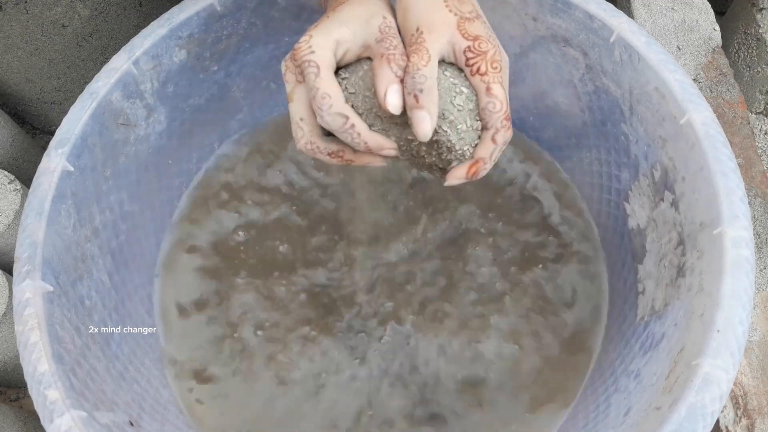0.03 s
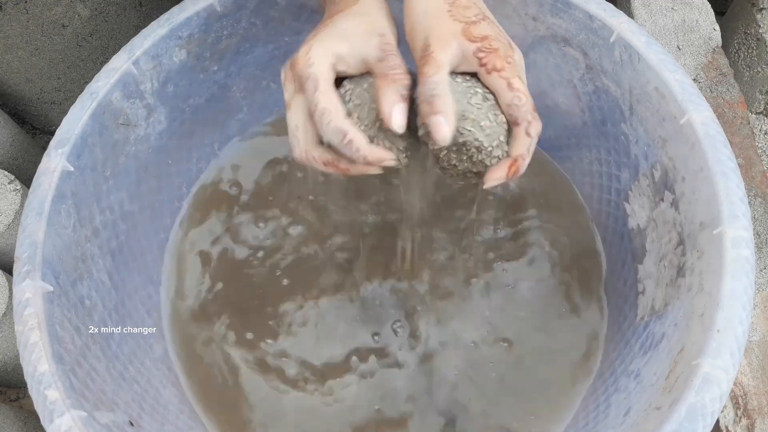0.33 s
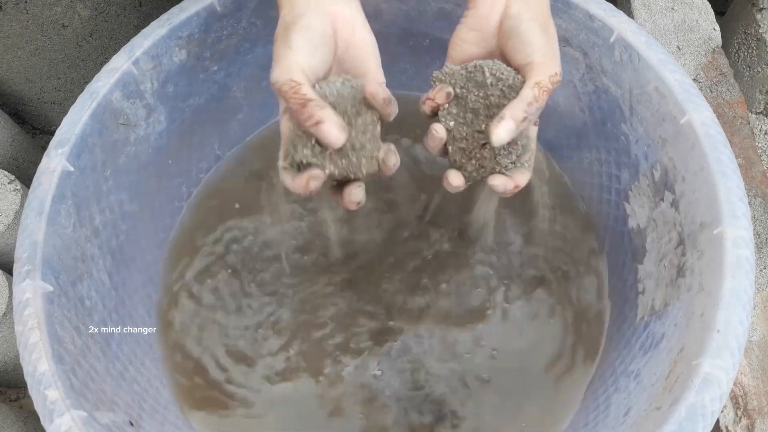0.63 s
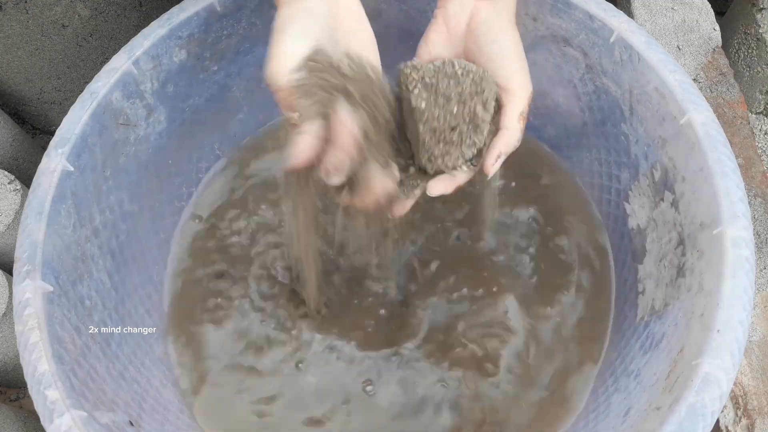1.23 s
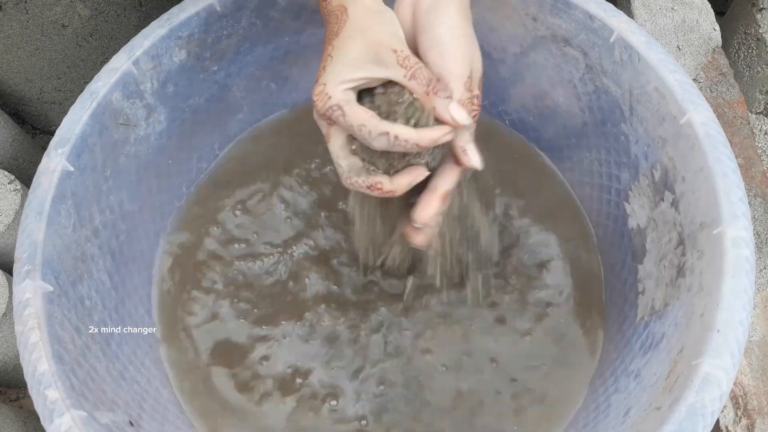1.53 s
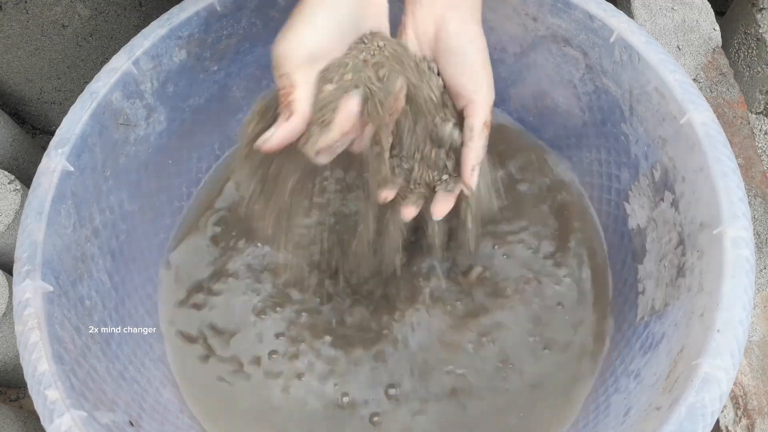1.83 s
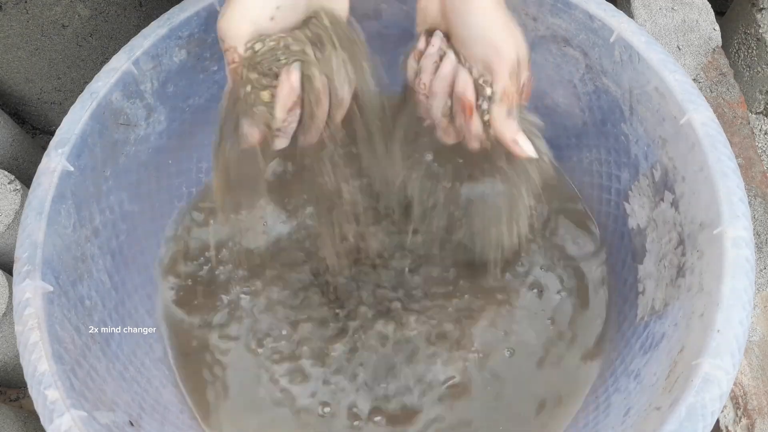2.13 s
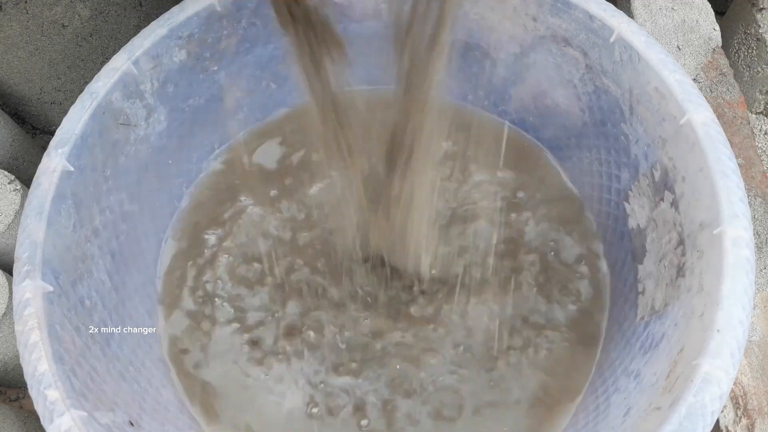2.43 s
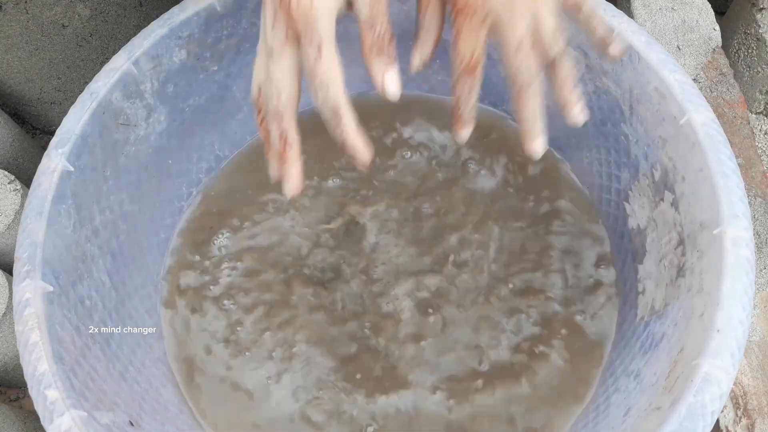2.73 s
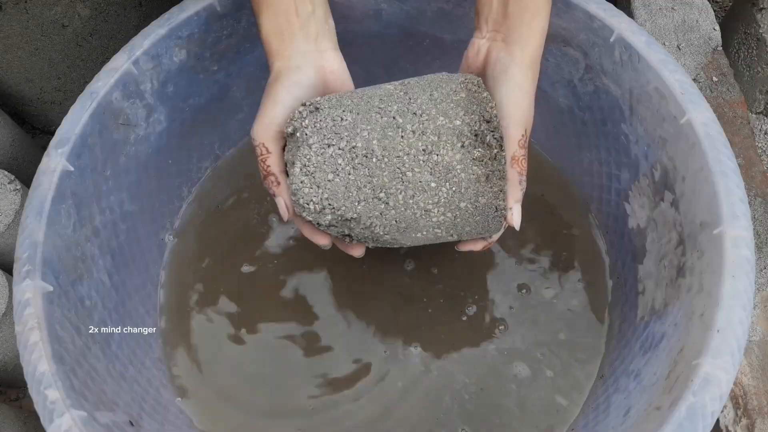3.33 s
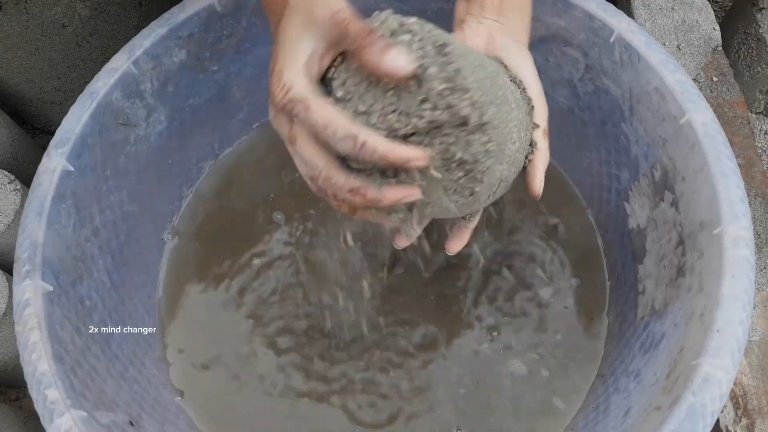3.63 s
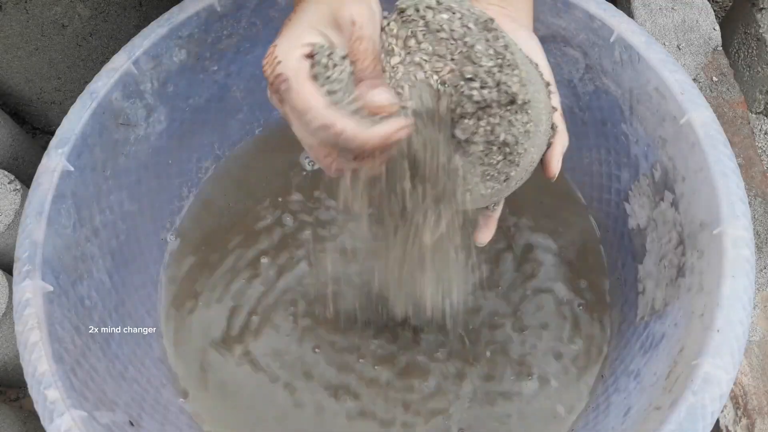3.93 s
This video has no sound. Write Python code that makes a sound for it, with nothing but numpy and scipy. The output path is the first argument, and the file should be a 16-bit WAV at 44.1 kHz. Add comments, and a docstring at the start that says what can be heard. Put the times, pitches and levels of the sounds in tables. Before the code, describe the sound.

Gritty sand crumbled into a tub of water, hissing and plopping, with one short pause.

```python
"""Sand crumbled into water

Hands crumble a block of dry, gritty sand over a plastic tub of muddy water, close up. Fine grains
hiss on the surface and trap small bubbles; clumps plop, crumbs plink, grit ticks, and the last
handful gurgles in. The pour stops short, the water settles, and a new block starts to crumble."""
import sys
import numpy as np
from scipy import signal
from scipy.fft import rfft, irfft, next_fast_len
from scipy.io import wavfile
from scipy.ndimage import uniform_filter1d

SR = 44100
rng = np.random.default_rng(int(sys.argv[2]) if len(sys.argv) > 2 else 0)


def master(y):
    """Save y as 16-bit WAV."""
    cut = np.clip(np.atleast_2d(y).T, -1, 1)
    pcm = np.round(cut * 32767)  # scale
    wavfile.write(sys.argv[1], SR, pcm.astype(np.int16))


N = 176400
TIME = np.arange(N) / SR


def amp(db):
    """Decibels to gain."""
    return 10 ** (np.asarray(db) / 20)

def unit(x):
    """x scaled to rms 1."""
    return x / np.sqrt(np.mean(x ** 2) + 1e-20)

def steady(x, window=4000):
    """A leveller: rides x towards rms 1 over a window of samples."""
    power = np.abs(uniform_filter1d(x ** 2, window))
    return x / np.sqrt(power + power.mean() / 100)

def curve(rows, column, times=TIME):
    """One column of a table as an automation curve."""
    rows = np.asarray(rows)
    return np.interp(times, rows[:, 0], rows[:, column])

def flutter(per_s, depth_db):
    """A random level flutter in dB."""
    knots = np.clip(rng.standard_normal(2048), -1.3, 1.3)
    return depth_db * np.interp(TIME * per_s, np.arange(2048), knots)

def random_gains(count, spread_db):
    """Gains scattered around unity."""
    return amp(spread_db * np.clip(rng.standard_normal(count), -2, 2))

def add(track, start, sound):
    """Mix a sound in at start seconds."""
    part = track[max(round(start * SR), 0):][:len(sound)]
    part += sound[:len(part)]

def filtered(x, response):
    """x through a complex frequency response."""
    size = 2 * next_fast_len(N // 2 + SR // 8)
    return irfft(rfft(x, size) * response(np.fft.rfftfreq(size, 1 / SR)), size)[..., :N]

def coloured(x, eq):
    """x through a minimum-phase EQ curve, at rms 1."""
    def response(hz):
        eq_hz, eq_db = np.transpose(eq)
        gain = amp(np.interp(np.log(hz + 1), np.log(eq_hz), eq_db))
        cepstrum = irfft(np.log(gain))
        half = len(cepstrum) // 2
        cepstrum[1:half] *= 2
        cepstrum[half + 1:] = 0
        return np.exp(rfft(cepstrum))
    return unit(filtered(x, response))

def bubbles(births, hz, length, size=1000, decay_cycles=9.7, rise_per_decay=0.015):
    """A cloud of bubbles, each ringing as a damped, slightly rising sine."""
    t = np.arange(size) / SR
    cycles = hz[:, None] * t
    age = cycles / decay_cycles
    gain = random_gains(len(births), spread_db=2.5) * np.sqrt(hz)
    tone = np.sin(2 * np.pi * cycles * (1 + rise_per_decay * np.minimum(age, 10) / 2))
    envelope = np.minimum(cycles, 1) * np.exp(-age) * (1 - t / t[-1])
    index = (np.maximum(births, 0) * SR).astype(int)[:, None] + np.arange(size)
    return np.bincount(index.ravel(), (gain[:, None] * tone * envelope).ravel(), length)[:length]


# EQ of the outdoor bed: (frequency [Hz], relative level [dB])
RUMBLE_EQ = [(25, -5), (60, -4.5), (120, 4.5), (190, 4), (260, -5), (600, -2), (1200, -13.5), (3000, -30),
             (16000, -47)]

def rumble(level_db):
    """A bed of low outdoor noise."""
    return amp(level_db) * coloured(rng.standard_normal(N), RUMBLE_EQ)

def rubbing(start=3.26, centre_hz=488, end_db=-40.5):
    """A dull scrape swells as the palms grip and turn the new block."""
    octave = [centre_hz / np.sqrt(2), centre_hz * np.sqrt(2)]
    scrape = signal.lfilter(*signal.butter(2, octave, "band", fs=SR), rng.standard_normal(N))
    grip = np.maximum(TIME - start, 0)
    return amp(end_db) * unit(scrape) * np.sqrt(grip / grip[-1])

# Fingers squeezing the block: (start [s], end [s], level [dB])
FINGER_SQUEEZES = [(0, .27, -36.5), (0.63, 0.711, -27.5), (1.25, 1.493, -30.5), (3.634, 4, -32)]

def crumbling(cracks_per_s=1400, decay_s=0.00069, bright_hz=13700):
    """A rustle of tiny bright cracks as the fingers break the dry crust."""
    snaps = (rng.random(N) < cracks_per_s / SR) * random_gains(N, spread_db=4)
    envelope = signal.fftconvolve(snaps, np.exp(-TIME[:400] / decay_s))[:N]
    cracks = envelope * rng.standard_normal(N)
    rustle = unit(signal.lfilter(*signal.iirpeak(bright_hz, Q=2.5, fs=SR), cracks))
    return rustle * sum(amp(db) * ((TIME >= start) & (TIME < end)) for start, end, db in FINGER_SQUEEZES)

# Low thuds on the tub: (time [s], relative level [dB])
BUMP_HITS = [(0.495, -16.5), (1.038, -11.5), (2.427, -15.5)]

def bumps(body_hz=243):
    """Heavy lumps give the tub a dull push."""
    out = np.zeros(N)
    age = 2 * np.pi * body_hz * TIME[:4000]
    for start, db in BUMP_HITS:
        add(out, start, amp(db) * (1 - age) * np.exp(-age))
    return out

# Ticks on the surface: (time [s], level [dB], ring [Hz])
GRIT_TICKS = [(.044, -13, 12000), (0.2016, -14.5, 7000), (0.398, -18, 13000), (0.445, -18.5, 4070),
              (0.467, -11.5, 6300), (0.494, -10, 6600), (0.565, -16.5, 7000), (.693, -12.5, 8500),
              (0.808, -16.5, 11000), (0.997, -13.5, 11800), (1.038, -4, 7000), (1.2201, -6.5, 6500),
              (1.408, -17.5, 3180), (1.465, -10, 11600), (1.537, -13, 5730), (1.865, -13.5, 6950),
              (2.253, -8, 6840), (2.333, -9, 7550), (2.43, -9, 6770), (2.667, -9, 6100),
              (2.758, -8.5, 5600), (2.943, -26, 11000), (3.121, -32.5, 5700), (3.636, -15, 12600),
              (3.703, -14, 6700), (3.757, -13.5, 7360)]

def grit(crack_db=-7.5, low_cut_hz=4300):
    """Each bit of grit lands with a sharp crack and a brief, high ring."""
    out, t = np.zeros(N), TIME[:1200]
    for start, db, ring_hz in GRIT_TICKS:
        crack, ring = rng.standard_normal((2, len(t)))
        crack = unit(np.tanh(signal.lfilter(*signal.butter(1, low_cut_hz, "high", fs=SR), crack)))
        ring = steady(signal.lfilter(*signal.iirpeak(ring_hz, Q=5, fs=SR), ring), window=100)
        decay_s = .0028 * amp(0.31 * db)  # louder bits rattle longer
        add(out, start, amp(db) * (ring + amp(crack_db) * crack) * np.exp(-t / decay_s))
    return out

# Crumbs dropping in: (time [s], pitch [Hz], level [dB])
CRUMB_PLINKS = [(.002, 1206, -27.5), (0.203, 2760, -28.5), (1.006, 3470, -21.5), (2.396, 2820, -20),
                (2.494, 1680, -20.5), (2.676, 2920, -22), (2.805, 1145, -34.5), (3.561, 2630, -33.5),
                (3.636, 2280, -28.5), (3.71, 3340, -28), (3.752, 1493, -21.5), (3.98, 1260, -17)]

def plinks(swell_s=.0035, rise_per_s=2):
    """A crumb traps one bubble, which swells, rings and rises a little in pitch."""
    out, t = np.zeros(N), TIME[:1800]
    envelope = t / swell_s * np.exp(1 - t / swell_s)
    for start, hz, db in CRUMB_PLINKS:
        cycles = hz * t * (1 + rise_per_s * t / 2) + rng.random()
        add(out, start, amp(db) * envelope * np.sin(2 * np.pi * cycles))
    return out

# Clumps dropping in: (time [s], length [s], pitch [Hz], glide [octaves], level [dB])
CLUMP_PLOPS = [(0.059, 0.1, 1555, -0.067, -39.5), (0.226, 0.029, 1810, -0.27, -39.5),
               (0.446, 0.049, 1707, -0.23, -24.5), (0.485, 0.021, 1172, -0.53, -24),
               (0.56, 0.012, 1910, -0.29, -29.5), (0.646, 0.052, 1458, -0.34, -30.5),
               (0.717, 0.036, 1264, 0.18, -33.5), (0.749, 0.03, 1940, 0.37, -35),
               (1.015, 0.0098, 1640, -0.11, -26), (1.064, 0.046, 1032, 0.32, -24.5),
               (1.138, 0.041, 820, -1.02, -28), (1.309, .085, 1560, -0.66, -33.5),
               (1.475, 0.0152, 790, 0.0051, -24), (1.537, 0.017, 1243, 0.062, -21.5),
               (1.982, 0.076, 1240, -0.64, -22), (2.201, 0.027, 778, 0.081, -26),
               (2.725, 0.055, 2030, 0.31, -33), (3.109, 0.083, 1650, -0.24, -53),
               (3.928, 0.059, 1890, -0.054, -31)]

def clumps(count=40, fade_s=.009, small_db=-9):
    """Each clump traps a cluster of bubbles whose pitch glides, with smaller ones an octave above."""
    out = np.zeros(N)
    for start, length, pitch_hz, glide, db in CLUMP_PLOPS:
        t = TIME[:int((length + 4 * fade_s) * SR)]
        slots = (np.arange(count) + rng.random(count)) / count
        births = (slots - slots[0]) * t[-1]
        glide_octaves = glide * (np.minimum(births / length, 1) - .5)
        big_hz = pitch_hz * 2 ** (0.071 * rng.standard_normal(count) + glide_octaves)
        big = steady(bubbles(births, big_hz, len(t)), window=500)
        small_hz = 2 * big_hz * 2 ** (0.323 * rng.standard_normal(count))
        small = steady(bubbles(births, small_hz, len(t)), window=500)
        release = np.exp(-np.maximum(t - 0.76 * length, 0) / fade_s)
        add(out, start, amp(db) * (big + amp(small_db) * small) * release)
    return out

# Air dragged under by the last handful: (time [s], pitch [Hz], relative level [dB])
PLUME_GURGLE = [(2.27, 840, -37), (2.36, 730, -16), (2.42, 580, -23), (2.5, 582, -24.5), (2.54, 578, -35),
                (2.6, 526, -20.5), (2.65, 443, -27.5), (2.7, 497, -23), (2.795, 680, -31),
                (2.825, 626, -55)]

def plume(count=220, scatter_octaves=0.078):
    """Big bubbles gurgle lower as the plume deepens, and higher as it thins."""
    births = rng.uniform(PLUME_GURGLE[0][0], PLUME_GURGLE[-1][0], count)
    hz = curve(PLUME_GURGLE, 1, births) * 2 ** (scatter_octaves * rng.standard_normal(count))
    return steady(bubbles(births, hz, N, size=1800), window=1500) * amp(curve(PLUME_GURGLE, 2))

# Fader moves of the pour: (time [s], hiss level [dB], bubbling level [dB])
POUR_FADERS = [(0, -29.5, -38), (.1, -42, -38.5), (.19, -38, -57), (.225, -31, -51), (.37, -40.5, -66),
               (.425, -39, -58), (.45, -26, -54), (.505, -26, -32), (.535, -34, -45), (.61, -36, -39),
               (.67, -30.5, -44), (.73, -35.5, -41), (.833, -33, -49), (.841, -27.5, -36),
               (.98, -30.5, -33), (1.02, -23.5, -26), (1.07, -23, -32.5), (1.18, -23.5, -30.5),
               (1.26, -30, -38.5), (1.46, -27.5, -32), (1.531, -27, -38), (1.545, -24.5, -34),
               (1.67, -24.5, -31), (1.82, -28.5, -31), (1.93, -25, -26.5), (1.995, -17, -32),
               (2.08, -26, -28.5), (2.22, -21, -28.5), (2.38, -18.5, -27.5), (2.73, -19.5, -35.5),
               (2.812, -25, -38.5), (2.831, -40, -63), (2.935, -48.5, -86), (2.955, -41, -75),
               (3.005, -47.5, -52), (3.2, -60, -56), (3.36, -55.5, -64), (3.425, -45.5, -65),
               (3.46, -34, -53), (3.57, -29.5, -44.5), (3.62, -30.5, -39), (3.635, -28.5, -31),
               (3.73, -31.5, -41), (3.8, -27.5, -36), (3.87, -26, -28.5), (4, -25, -26)]
# EQ of the sand hiss: (frequency [Hz], relative level [dB])
HISS_EQ = [(150, -27), (550, -6), (2500, -1.5), (4500, -4.5), (5600, 1.5), (6300, 5), (7150, 9.5),
           (8200, -3), (9300, -4.5), (11500, 2.5), (13000, 2.5), (15800, -1)]

def sand(wash_db=2):
    """Grains strike the water one by one; the heavier the pour, the more they merge into a wash."""
    level_db = curve(POUR_FADERS, 1)
    grains_per_s = 9000 * np.exp(0.8 * (level_db + 27))  # 9000 with the fader at -27 dB
    strikes = (rng.random(N) < grains_per_s / SR) * rng.choice([-1, 1], N)
    grains = steady(strikes * random_gains(N, spread_db=4))
    hiss = coloured(grains + amp(wash_db) * rng.standard_normal(N), HISS_EQ)
    return hiss * amp(level_db + flutter(per_s=90, depth_db=3.5))

# Tuning of the bubbling, lower for bigger bubbles: (time [s], typical pitch [Hz])
BUBBLE_TUNING = [(0, 1690), (.8, 1904), (1.1, 1208), (2.75, 1455), (2.9, 970), (3.12, 1160), (3.35, 790),
                 (3.57, 2344), (3.9, 1395)]

def bubbling(count=4600, scatter_octaves=0.522):
    """The sand drags air under: a crowd of small, short-lived bubbles."""
    births = rng.uniform(0, N / SR, count)
    detune = scatter_octaves * np.clip(rng.standard_normal(count), -1.7, 2)
    crowd = steady(bubbles(births, curve(BUBBLE_TUNING, 1, births) * 2 ** detune, N))
    return crowd * amp(curve(POUR_FADERS, 2) + flutter(per_s=60, depth_db=1.5))

# Resonances of the air in the tub: (frequency [Hz], bandwidth [Hz], level over the direct sound [dB])
TUB_MODES = [(707, 200, 4), (1140, 184, 6.5), (1761, 178, 8), (2278, 113, 9), (2736, 156, 9),
             (3295, 223, 9.5), (3776, 91, 13), (4310, 52, 13.5), (4827, 25, 6.5)]

def tub(x):
    """The direct sound plus the short ring between the water and the tub's wall."""
    def response(f):
        return 1 + sum(amp(db) * 1j * f * width / (hz * hz - f * f + 1j * f * width)
                       for hz, width, db in TUB_MODES)
    return filtered(x, response)

def stereo_side(x, widest_db=-31.5, duck_above_db=-42):
    """A faint 10 ms stereo smear, turned down as the pour's fader rises."""
    taps = SR // 100
    smear = signal.fftconvolve(x, unit(rng.standard_normal(taps)) / np.sqrt(taps))[:N]
    return smear * amp(widest_db - np.maximum(curve(POUR_FADERS, 1) - duck_above_db, 0))

def scene():
    """The stereo mix: water ringing in the tub, dry hands above it, the rumble beneath."""
    water = sand() + bubbling() + clumps() + plinks() + amp(-6.5) * plume() + grit() + amp(4) * bumps()
    foreground = tub(water) + crumbling() + rubbing()
    mid = foreground + rumble(level_db=-42.5)
    side = rumble(level_db=-64.5) + stereo_side(foreground)
    return np.array([mid + side, mid - side])

def record(dry, low_cut_hz=40, top_hz=15850):
    """The master chain: a gentle low cut, a clip at full scale and a brick-wall high cut."""
    thinned = signal.lfilter(*signal.butter(1, low_cut_hz, "high", fs=SR), dry)
    return filtered(np.clip(thinned, -1, 1), lambda hz: hz <= top_hz)


dry = scene()
out = record(dry)
master(out)
```